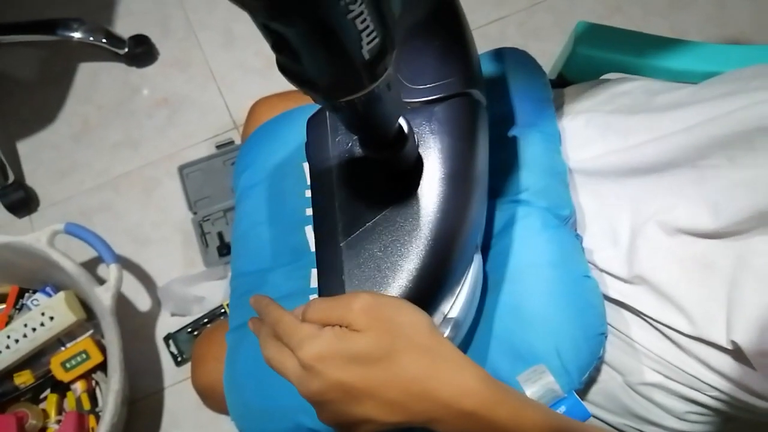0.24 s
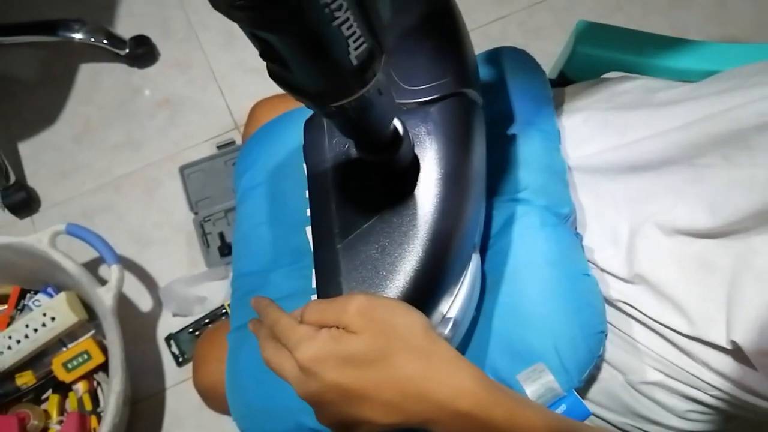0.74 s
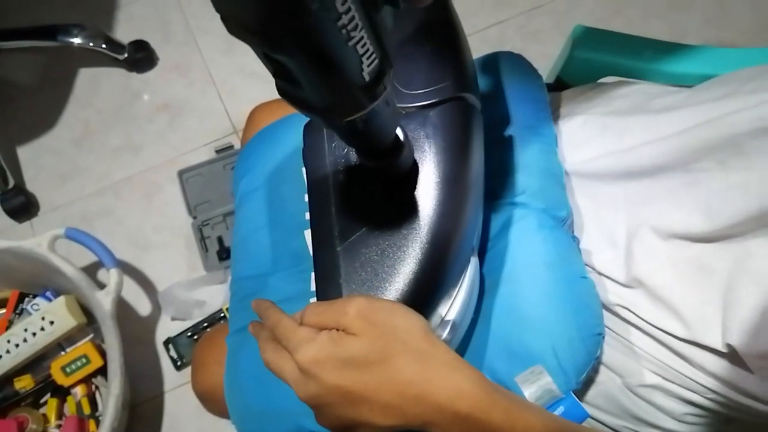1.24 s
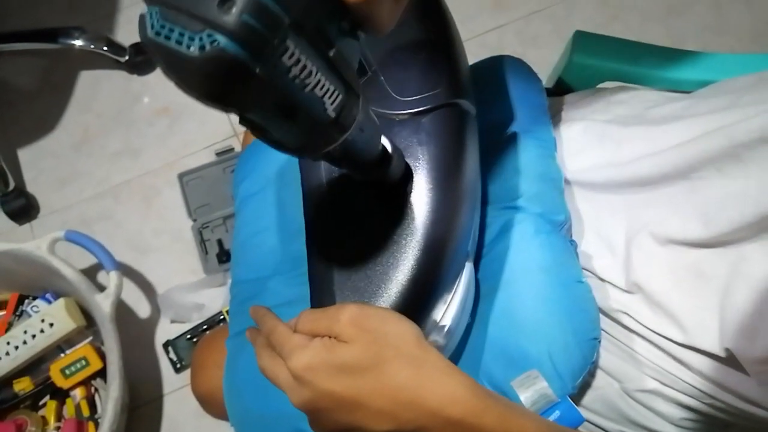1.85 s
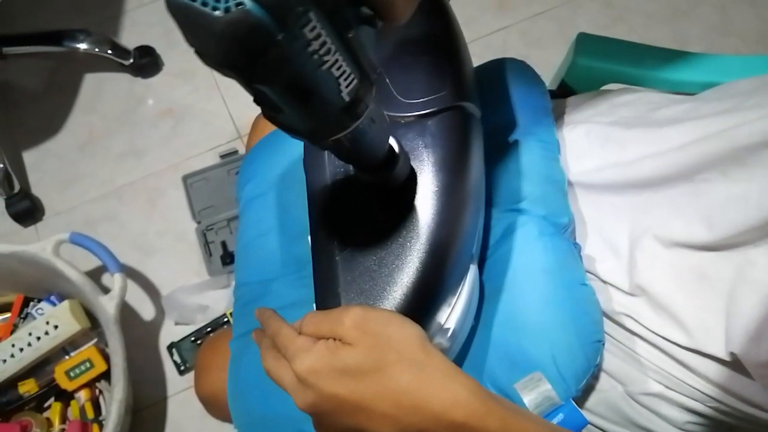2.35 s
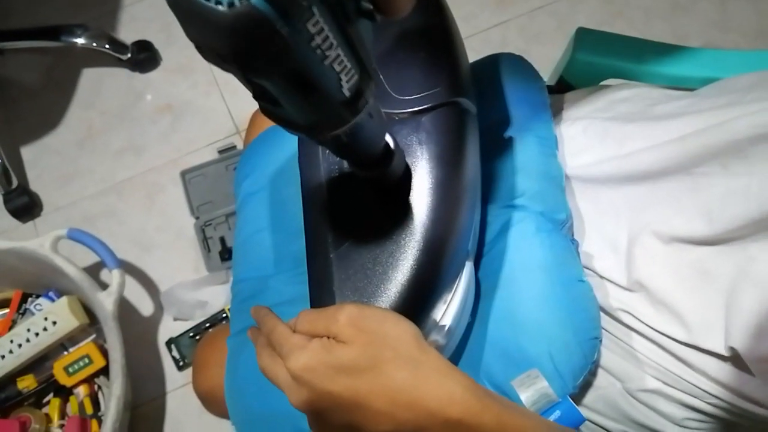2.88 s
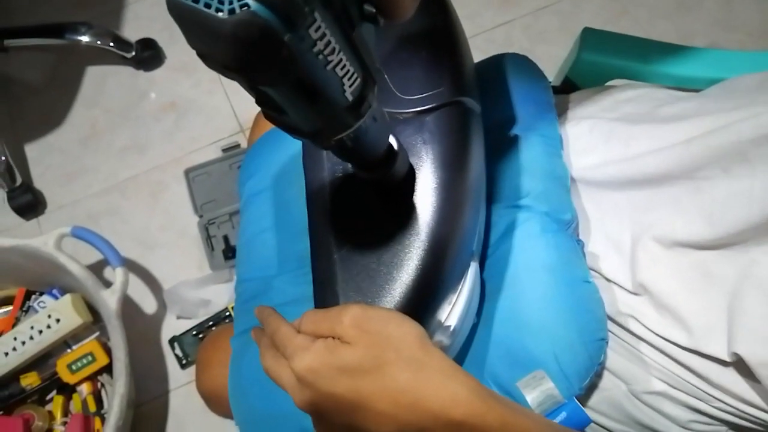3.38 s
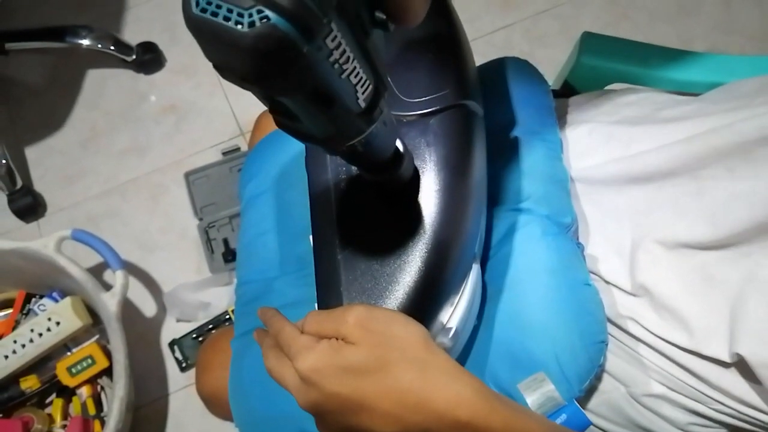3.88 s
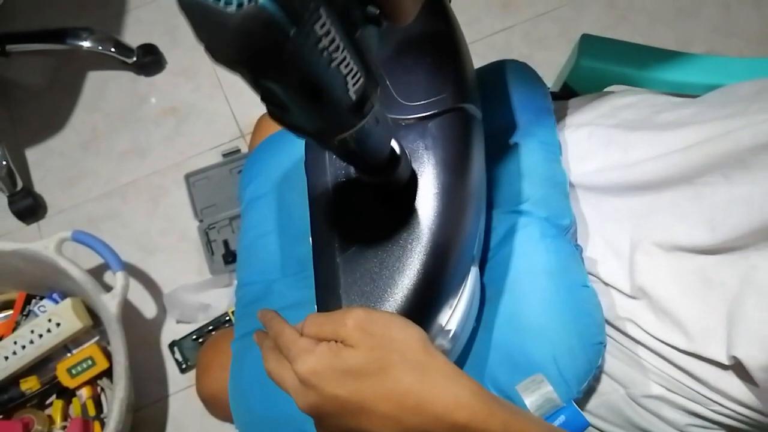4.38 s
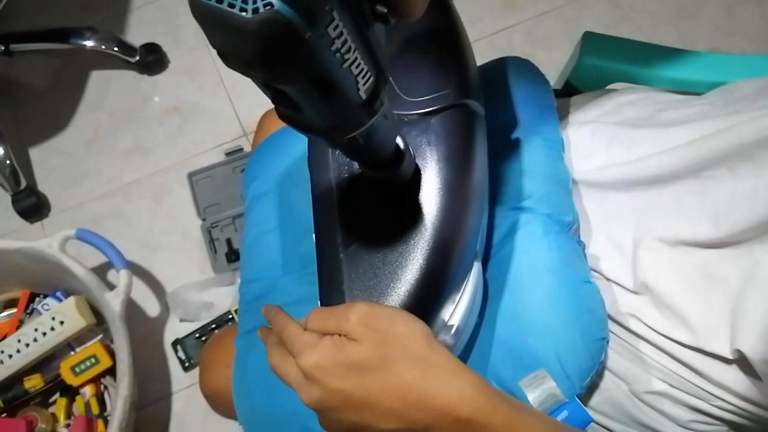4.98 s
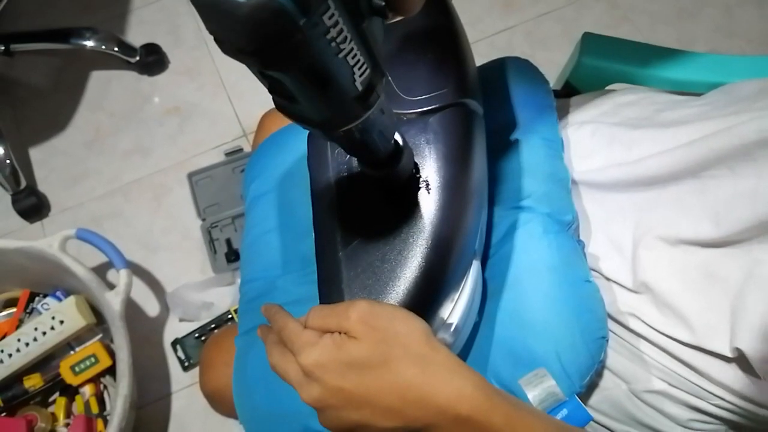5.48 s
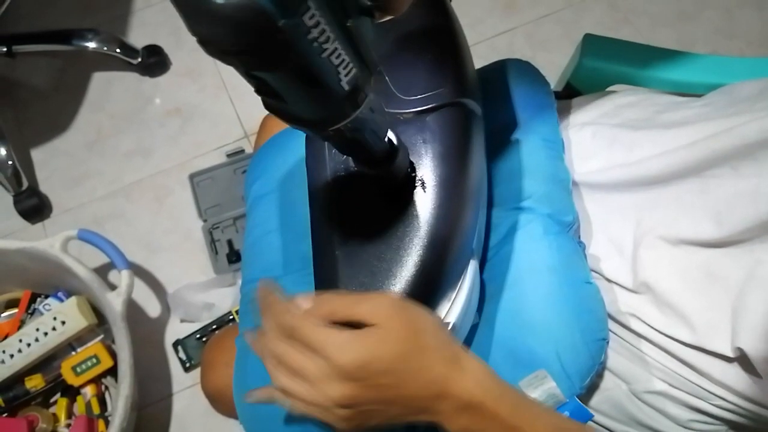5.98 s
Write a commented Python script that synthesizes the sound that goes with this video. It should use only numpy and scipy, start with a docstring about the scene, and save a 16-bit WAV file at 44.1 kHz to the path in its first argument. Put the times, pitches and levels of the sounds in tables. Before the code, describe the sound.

Close by in a small tiled room, a power drill with a hole saw grinds through a plastic shell for five seconds and stops abruptly.

```python
"""A cordless drill turns a hole saw against a hollow plastic panel, close by, in a small tiled room.
It creeps on a light trigger, steps up a little, spins up, sags as the saw bites, and brakes to a stop.
One shaft speed drives its motor and gear tones; filtered noise makes the rasp, rattle and panel drone.
The panel rings on briefly; then a hand slides off it with soft knocks and thin squeaks, over room tone."""
import sys
import numpy as np
from scipy import signal
from scipy.fft import rfft, irfft, next_fast_len
from scipy.io import wavfile
from scipy.ndimage import map_coordinates

SR = 44100
rng = np.random.default_rng(int(sys.argv[2]) if len(sys.argv) > 2 else 0)


def file_out(sig):
    """Save sig as 16-bit WAV at sys.argv[1]."""
    # one column per channel
    cols = np.atleast_2d(sig).T
    # limit, then scale
    lim = np.clip(cols, -1, 1)
    pcm = np.round(lim * 32767).astype(np.int16)
    wavfile.write(sys.argv[1], SR, pcm)


N = 274886  # length in samples


def amp(db):
    """Turn decibels into a gain."""
    return 10 ** (np.asarray(db) / 20)


def unit(x):
    """Scale to an average (rms) strength of 1."""
    return x / np.sqrt(np.mean(x ** 2) + 1e-20)


def along(points, hz):
    """Read a value between (Hz, value) points, with frequency on a log axis."""
    f, v = np.transpose(points)
    return np.interp(np.log(hz + 1), np.log(f + 1), v)


def clock():
    """Time of each sample in seconds."""
    return np.arange(N) / SR


def ramp(start, rise):
    """Go from 0 to 1 in rise seconds."""
    return np.clip((clock() - start) / rise, 0, 1)


def swell(start, length, db):
    """A rounded rise and fall that peaks at db."""
    return amp(db) * np.sin(np.pi * ramp(start, length)) ** 2


def wobble(rate):
    """A random curve through rate knots a second, drawn with 8192 straight-joined points."""
    knots = rng.standard_normal(int(N * rate / SR) + 4)
    coarse = np.linspace(0, N, 8192)
    values = map_coordinates(knots, [coarse * rate / SR])
    return np.interp(np.arange(N), coarse, values)


def filtered(x, response):
    """Shape the spectrum of x with a gain that depends on frequency."""
    m = next_fast_len(N + SR // 4)
    gain = response(np.fft.rfftfreq(m, 1 / SR))
    return irfft(rfft(x, m) * gain, m)[..., :N]


def pan(lean_db):
    """Left and right gains of unit mean power; positive leans left."""
    gains = amp(np.array([lean_db, -lean_db]) / 2).reshape(2, -1)
    return gains / np.sqrt(np.mean(gains ** 2, axis=0))


# How alike noise is on the left and right.
# Each row: frequency in Hz, likeness (1 is the same, 0 unrelated; larger values are clipped to 1).
ALIKENESS = [(60, 1.7), (120, 0), (240, 4.5), (480, 0.46), (950, 0.57), (1890, 0.53), (3770, 0.25),
             (7520, 0.09), (15000, -0.03)]
# How noise leans to one side. Each row: frequency in Hz, left over right in dB.
SIDE_LEAN = [(300, 1), (900, -3.5), (1350, 3.5), (1800, 2), (2300, -1.5), (2900, -5), (3500, -2),
             (4100, -3.5), (4900, 6.5), (6200, 1), (7200, -4.5), (8500, -0.5), (11000, 1), (15000, 2.5)]


def rush(spectrum, force=1):
    """Random contacts of a given force heard through a body: shaped stereo noise of rms 1."""
    def mid_and_side(hz):
        turn = np.arccos(np.clip(along(ALIKENESS, hz), -1, 1)) / 2
        gain = amp(along(spectrum, hz)) * (hz < spectrum[-1][0])
        return gain * [np.cos(turn), np.sin(turn)]

    mid, side = filtered(force * rng.standard_normal((2, N)), mid_and_side)
    stereo = np.array([mid + side, mid - side])
    return unit(filtered(stereo, lambda hz: pan(along(SIDE_LEAN, hz))))


def tone(angle, flutter, rate):
    """A partial of about rms 1 whose strength and phase flutter."""
    steady_part = (1 + flutter * wobble(rate)) * np.sin(angle)
    loose_part = flutter * wobble(rate) * np.cos(angle)
    return np.sqrt(2 / (1 + 2 * flutter ** 2)) * (steady_part + loose_part)


def ports(angle, multiple, lean_db, lead, flutter, rate):
    """A shaft tone at both microphone ports, its phase lead radians ahead on the left."""
    strength_flutter, phase_flutter = wobble(rate), wobble(rate)
    phase = multiple * angle + rng.uniform(0, 2 * np.pi) + np.array([[lead], [-lead]]) / 2
    line = (1 + flutter * strength_flutter) * np.sin(phase + flutter * phase_flutter)
    return pan(lean_db) * np.sqrt(2 / (1 + flutter ** 2)) * line


# Colour of the room tone. Each row: frequency in Hz, relative level in dB.
ROOM_COLOUR = [(15, -37), (25, -14), (98, -18.5), (150, -7.5), (167, -14.5), (543, -16), (588, -10.5),
               (691, -19), (952, -13), (1030, -12.5), (1420, -22.5), (2300, -17), (4040, -31), (6200, -33),
               (7090, -28.5), (8000, -37.5), (15000, -57)]
# Faint steady tones in the room. Each row: frequency in Hz, level in dB.
ROOM_TONES = [(586.8, -74.5), (748.3, -78), (1039, -77.5), (1157, -79.5)]
# Bumps on the hand-held microphone. Each row: start in seconds, length in seconds, peak level in dB.
MIC_BUMPS = [(5.4, 0.34, -61), (5.77, 0.17, -53), (5.85, 0.47, -60.5)]
# Swells of a faint low hum. Each row: start in seconds, length in seconds, peak level in dB.
HUM_SWELLS = [(5.65, .75, -66.5), (5.94, 0.15, -60)]


def background():
    """Room tone with faint steady tones, a low hum and the rumble of a hand-held microphone."""
    rumble_colour = [(20, 4), (55, -9), (110, -4), (220, -25)]  # Hz, relative dB
    rumble = sum(swell(*bump) for bump in MIC_BUMPS) * rush(rumble_colour)
    hum_tone = tone(2 * np.pi * 153 * clock(), flutter=.5, rate=20)
    hum = sum(swell(*row) for row in HUM_SWELLS) * hum_tone
    steady = 0
    for hz, db in ROOM_TONES:
        steady = steady + amp(db) * tone(2 * np.pi * hz * clock(), flutter=.4, rate=11)
    return amp(-59.5) * rush(ROOM_COLOUR) + steady + rumble + hum


# How long the echo lasts. Each row: frequency in Hz, time in seconds to fall by 60 dB.
ECHO_TIMES = [(200, 0.39), (2000, 0.43), (5000, 0.31), (14000, 0.3)]


def room(x):
    """The walls answer with a noisy tail, in which each frequency dies at its own speed."""
    hz, t, z = signal.stft(rng.standard_normal((2, SR // 2)), SR, nperseg=256)
    decay = amp(-60 * t / along(ECHO_TIMES, hz)[:, None])
    tail = signal.istft(z * decay, SR, nperseg=256)[1]
    tail *= np.arange(tail.shape[1]) > .006 * SR  # silent for the first 6 ms
    return signal.fftconvolve(x, tail / np.linalg.norm(tail[0]), axes=1)[:, :N]


# Thin squeaks on the plastic.
# Each row: start in seconds, length in seconds, start in Hz, end in Hz, level in dB before a 4.5 dB lift.
PLASTIC_SQUEAKS = [(6.114, 0.073, 6550, 5798, -66), (6.185, .06, 4380, 4700, -56)]


def squeaks():
    """Sticking and slipping on smooth plastic gives short, rough glides."""
    out = np.zeros(N)
    for start, length, start_hz, end_hz, db in PLASTIC_SQUEAKS:
        progress = ramp(start, length)
        glide = start_hz + (end_hz - start_hz) * np.sqrt(progress)
        rough_hz = glide * (1 + 0.065 * wobble(1400))
        out += amp(db + 4.5) * np.sin(np.pi * progress) * np.sin(2 * np.pi * np.cumsum(rough_hz) / SR)
    return out


# Colour of skin sliding on the panel. Each row: frequency in Hz, relative level in dB.
SKIN_COLOUR = [(530, -30), (900, -15), (1440, -14), (2360, -2), (2530, -21), (2620, -5), (5100, -17),
               (6120, -21), (14000, -35)]
# Colour of the panel's shell. Each row: frequency in Hz, relative level in dB.
SHELL_COLOUR = [(120, -20), (250, -5), (350, 5), (550, -7), (800, -18), (1150, -6), (1500, -20),
                (2200, -14), (4000, -26), (12000, -42)]
# The panel ringing on as the drill stops, then soft knocks.
# Each row: start in seconds, level in dB before the onset is softened.
SHELL_BURSTS = [(5.295, -35), (5.37, -47), (6.134, -49), (6.15, -46)]
SLIDE_S, SLIDE_RISE_S, SLIDE_DB = 5.96, 0.1, -58.5  # start and rise in seconds, level in dB


def handling():
    """Rough, quickly fluttering skin noise for the sliding hand; short shell bursts ring and knock."""
    skin = rush(SKIN_COLOUR, amp(2.0 * wobble(120)))
    slide = amp(SLIDE_DB) * ramp(SLIDE_S, SLIDE_RISE_S) * skin
    bursts = 0
    for start, db in SHELL_BURSTS:
        age = np.maximum(clock() - start, 0)
        # each burst falls 60 dB in 85 ms
        bursts = bursts + amp(db - 60 * age / 0.085) * (1 - np.exp(-age / 0.0024))
    return slide + bursts * rush(SHELL_COLOUR)


# light trigger: shaft speed at the start and after a nudge of the finger (turns per second)
CREEP_SPEED, NUDGE_SPEED = 115.6, 129.1
CREEP_GAIN = 26  # turns per second gained each second until the nudge
NUDGE_S, NUDGE_RISE_S = .103, .046  # time of the nudge, and how long the shaft takes to follow
PULL_S, SPIN_UP_S, SPIN_UP_SHAPE = .393, .114, 1.95  # trigger pulled home: time, spin-up time, steepness
EASE_S, SLOWING = 5.147, 485  # trigger eased: time, turns per second lost each second
RELEASE_S, BRAKE_S = 5.281, .033  # trigger let go: time, time constant of the braked shaft (s)


def nudged():
    """Share of the way from the first creeping speed to the second."""
    return 1 - np.exp(-(np.maximum(clock() - NUDGE_S, 0) / NUDGE_RISE_S) ** 2)


def pulled():
    """Share of the way from creeping to full speed."""
    return 1 - np.exp(-(np.maximum(clock() - PULL_S, 0) / SPIN_UP_S) ** SPIN_UP_SHAPE)


# The motor shaft at full trigger, sagging as the saw bites.
# Each row: time in seconds, speed in turns per second.
FULL_TRIGGER_SPEED = [(0.7, 353.7), (0.9, 352.3), (1.15, 354.4), (1.37, 352.5), (1.62, 354.2), (1.81, 346),
                      (1.92, 338), (2.0, 324.5), (2.09, 314.5), (2.56, 318.5), (2.63, 323.3), (2.75, 326),
                      (2.89, 326.7), (3.14, 341.3), (3.23, 339.5), (3.34, 334), (3.62, 333.3), (3.72, 331),
                      (3.86, 333.8), (4.5, 336.6), (4.95, 331.7), (5.03, 324.5), (5.14, 319)]


def shaft_speed():
    """The motor creeps, spins up, follows the load, slows with the trigger and is braked."""
    first = CREEP_SPEED + CREEP_GAIN * np.minimum(clock(), NUDGE_S)
    creeping = first + (NUDGE_SPEED - first) * nudged()
    full = np.interp(clock(), *np.transpose(FULL_TRIGGER_SPEED))
    running = creeping + pulled() * (full - creeping)
    eased = np.maximum(running - SLOWING * np.maximum(clock() - EASE_S, 0), 0)
    return eased * np.exp(-np.maximum(clock() - RELEASE_S, 0) / BRAKE_S)


# Shaft speeds in turns per second when the motor is laden, cutting and running light, in that order.
LOADED_SPEEDS = [316, 335, 353]


def by_speed(speed, free_db, fall):
    """Gain of a layer that loses fall dB for each turn per second below running light."""
    return amp(free_db - fall * (LOADED_SPEEDS[-1] - speed))


# Motor and gear tones while creeping, before the overall singing level.
# Each row: multiple of the shaft rate, dB before the nudge, dB after it.
CREEP_TONES = [(2, -58, -55), (10, -54, -36), (11, -52, -49), (11.25, -46, -54), (12, -58, -54),
               (21, -60, -52), (22.5, -52, -56), (29, -56, -46), (30, -51, -39.5), (31, -52, -38),
               (33.75, -35.5, -48), (34.65, -54, -44), (40, -50, -42), (41, -54, -45), (45, -38, -53),
               (46, -58, -48), (50, -62, -50), (57, -62, -49), (60, -58, -47)]
# Steady buzz on a light trigger. Each row: harmonic number, level in dB.
BUZZ_HARMONICS = [(2, -58), (3, -47), (4, -56), (5, -49.5), (6, -55.5), (7, -55.5), (8, -58), (9, -60),
                  (10, -57), (11, -47.5)]
SING_DB, SING_FALL = 1, .12  # singing level in dB; its fall in dB for each turn per second gained


def creep(speed, angle):
    """On a light trigger the motor sings thinly over a fixed-pitch buzz; a nudge changes the mix of tones."""
    singing = 0
    for k, first, second in CREEP_TONES:
        level = amp(first + (second - first) * nudged())
        line = ports(angle, k, lean_db=3.0, lead=min(k / 30, 1.5), flutter=0.1, rate=29.8)
        singing = singing + level * line
    buzz_hz = 118.6
    buzz = 0
    for k, db in BUZZ_HARMONICS:
        buzz = buzz + amp(db) * tone(2 * np.pi * k * buzz_hz * clock(), flutter=0.4, rate=16.3)
    sing_db = SING_DB - SING_FALL * np.maximum(speed - NUDGE_SPEED, 0)
    return (1 - pulled()) * (amp(sing_db) * singing + buzz)


GEAR_RATIO = 24  # shaft turns per turn of the saw
THROB_DB = 0.3  # overall lift of the panel's beating note
# The panel's note and its close neighbours, before the overall lift.
# Each row: steps of the saw's rate from the shaft rate, dB laden, dB cutting, dB running light.
THROB_TONES = [(-1, -58, -46.5, -56), (0, -42, -60, -54), (1, -53, -46.5, -43.2), (2, -62, -54, -58)]


def throb(speed, angle):
    """Shaft unbalance shakes the panel; the saw's rocking splits that note into close tones, which beat."""
    out = 0
    for sideband, *levels in THROB_TONES:
        note = tone(angle * (1 + sideband / GEAR_RATIO), flutter=.27, rate=22)
        out = out + np.interp(speed, LOADED_SPEEDS, amp(levels)) * note
    fade_in = np.interp(speed, [190, 300], [0, 1])  # turns per second
    return amp(THROB_DB) * fade_in * out


# Resonances of the housing. Each row: multiple of the shaft rate, centre in Hz, width in Hz, level in dB,
# left over right in dB, left lead in radians.
HOUSING_RESONANCES = [(3, 780, 120, -41, -2, .2), (7, 1880, 120, -42, -2, .4),
                      (10, 2760, 260, -36, -2, 1.2), (20, 5900, 280, -36, 0, .4),
                      (20, 7050, 260, -30.5, -8, 2.5), (23, 6850, 330, -39.5, -4, 1.6),
                      (30, 8300, 700, -45, -4, -1.5)]


def glides(speed, angle):
    """As the speed changes, single tones flare where they meet resonances of the housing."""
    out = 0
    for k, hz, width, db, lean_db, lead in HOUSING_RESONANCES:
        closeness = np.exp(-((k * speed - hz) / width) ** 2)
        out = out + amp(db) * closeness * ports(angle, k, lean_db, lead, flutter=.12, rate=36)
    return out


# Colour of the rasping teeth. Each row: frequency in Hz, relative level in dB.
RASP_COLOUR = [(280, -51), (480, -20.5), (650, -14), (800, -12), (1000, -9), (1150, -5.5), (1300, -0.6),
               (1550, -2.5), (1900, 0.5), (2150, -3), (2400, -3), (2750, -6), (3100, -11.5), (4000, -30.5)]
# Colour of the gear rattle at full trigger. Each row: frequency in Hz, relative level in dB.
RATTLE_COLOUR = [(2300, -44), (3150, -17.5), (3450, -7), (3700, -5.5), (4050, -0.5), (4400, -6),
                 (5100, 1.5), (5700, -4.5), (6300, -11.5), (7600, -8.5), (8500, -11.5), (10500, -14.5),
                 (12500, -18.5), (15000, -23.5)]
# Colour of the gear rattle on a light trigger. Each row: frequency in Hz, relative level in dB.
CREEP_RATTLE_COLOUR = [(2300, -35.5), (3150, -25), (3450, -13), (3700, -8), (4050, -1.5), (4380, -12),
                       (4600, -4), (4850, -7.5), (5150, 0), (5600, -6.5), (6250, -14), (7500, -10.5),
                       (8200, -16), (9500, -14), (11000, -21), (15000, -27)]
# Colour of the panel's drone. Each row: frequency in Hz, relative level in dB.
PANEL_COLOUR = [(20, -42.5), (65, -44), (115, -21), (160, -27.5), (210, -13), (245, -8.5), (275, -5.5),
                (325, -3.5), (370, 3), (400, -11), (500, -14.5), (700, -42.5)]
# levels running light (dB), and their fall for each turn per second below that (dB)
RASP_DB, RASP_FALL = -25, 0.057
RATTLE_DB, RATTLE_FALL = -23.5, 0.013
NUDGE_RASP_DB = 1  # how much quieter the rasp is before the nudge
CREEP_RATTLE_DB = -28  # the gears tick over on a light trigger
# the torque of spinning up loads gears and teeth: length in seconds, lifts in dB
SURGE_S, SURGE_RATTLE_DB, SURGE_RASP_DB = 0.21, 2.5, 0.5
PANEL_DB, PANEL_CREEP_DB = -45.5, -52.5  # panel drone at full and at light trigger
JOLT_S, JOLT_DB = 0.14, -42  # the torque of the pull jolts the panel: length, peak level


def cutting(speed, angle):
    """Teeth rasp, gears rattle in step with the shaft, and the saw makes the panel drone."""
    surge = swell(PULL_S, SURGE_S, 0)

    # teeth: the bite varies as the saw turns and wanders in its groove
    spindle = angle / GEAR_RATIO + 0.59 * wobble(12)
    bite = amp(0.44 * np.sin(spindle) + 0.23 * wobble(22.06) + 0.7 * wobble(600))
    shaft_pulse = 1 + 0.15 * np.cos(2 * angle) + 0.2 * np.cos(4 * angle)
    rasp_db = RASP_DB - NUDGE_RASP_DB * (1 - nudged()) + SURGE_RASP_DB * surge
    rasp = by_speed(speed, rasp_db, RASP_FALL) * rush(RASP_COLOUR, bite * shaft_pulse)

    # gears: the rattle cross-fades as the trigger is pulled
    meshing = 1 + 0.091 * sum(np.cos(k * angle + rng.uniform(0, 2 * np.pi)) for k in range(1, 6))
    clatter = meshing * amp(0.45 * wobble(30) + 1.1 * wobble(900))
    slow = np.sqrt(1 - pulled()) * amp(CREEP_RATTLE_DB) * rush(CREEP_RATTLE_COLOUR, clatter)
    fast_gain = by_speed(speed, RATTLE_DB, RATTLE_FALL)
    fast = np.sqrt(pulled()) * fast_gain * rush(RATTLE_COLOUR, clatter)
    rattle = amp(SURGE_RATTLE_DB * surge) * (slow + fast)

    # panel
    shaking = amp(PANEL_CREEP_DB + (PANEL_DB - PANEL_CREEP_DB) * pulled())
    jolt = swell(PULL_S - .02, JOLT_S, JOLT_DB)
    return rasp + rattle + (shaking + jolt) * rush(PANEL_COLOUR)


# Motor tones; the housing favours other ones at each speed. Each row: multiple of the shaft rate,
# dB laden, dB cutting, dB running light (all before a 0.5 dB trim and the growth with speed),
# left over right in dB, left lead in radians.
MOTOR_TONES = [(2, -42.5, -43.5, -48, 2, -.3), (3, -40, -41.5, -38, -3, .8), (4, -40, -36, -37, 3, -.3),
               (6, -42, -43, -43, 0, .4), (8, -56, -43.5, -46, -7, -.6), (10, -43, -42, -37, 3, 2.2),
               (11, -48, -42.5, -45, -1, .8), (12, -43, -43.5, -47, -1, .7), (14, -47, -47, -44, 8, 1.5),
               (15, -42, -41, -40, 9, .7), (17, -42, -46, -45, 6, -1), (19, -44, -56, -43, 1, 1.5),
               (20, -41.5, -38.5, -50, 2, 0), (22, -49, -47, -44, -3, -2.5), (23, -30, -34.5, -36, -5, 1.6),
               (24, -48, -50, -53, -1, 1.4), (29, -55, -49, -53, -5, 1.4), (30, -40.5, -46, -42, -2, -2.4),
               (40, -57, -57, -48, 6, -1.2)]
# How unsteady each motor tone is, at every load.
# Each row: multiple of the shaft rate, flutter from 0 to 1.
MOTOR_FLUTTER = [(2, .25), (4, .35), (20, .25)]
# The gear whistle, smothered while the motor is laden. Each row: speed in turns per second, level in dB.
WHISTLE_LEVELS = [(130, -70), (260, -45), (318.5, -41), (323, -33.8), (330, -32), (339, -32), (346, -30),
                  (353, -28.8)]


def whine(speed, angle):
    """Motor tones grow steeply up to laden speed; the first gear stage whistles between two of them."""
    tones = np.zeros((2, N))
    for multiple, *levels, lean_db, lead in MOTOR_TONES:
        flutter = np.interp(multiple, *np.transpose(MOTOR_FLUTTER))
        level = amp(np.interp(speed, LOADED_SPEEDS, levels))
        tones += level * ports(angle, multiple, lean_db, lead, flutter, rate=45)
    growth = np.minimum(speed / LOADED_SPEEDS[0], 1) ** 7
    motor = tones * amp(-0.5) * pulled() * growth

    mesh_order = 11.25  # whistle cycles per shaft turn
    whistle = ports(angle, mesh_order, lean_db=-4, lead=.3, flutter=0.05, rate=60)
    # the pinion runs slightly off centre, which adds a weak side tone
    sideband = amp(-25) * ports(angle, mesh_order + 1, lean_db=-5.5, lead=.7, flutter=0.29, rate=20)
    whistle_gain = amp(np.interp(speed, *np.transpose(WHISTLE_LEVELS)))
    return motor + whistle_gain * (whistle + sideband)


# Colour of the saw scraping as it comes to rest. Each row: frequency in Hz, relative level in dB.
SCRAPE_COLOUR = [(1400, -25), (2000, -1.5), (2900, 0.5), (3500, -12.5), (8000, -22.5)]
SCRAPE_S, SCRAPE_LENGTH_S, SCRAPE_DB = 5.3, 0.27, -57  # start, length, peak level
WHOOP_S, WHOOP_DB = 0.078, -43  # the motor whoops downward as it is braked: length, peak level


def drill():
    """One shaft drives the running layers and the brake cuts them off; a whoop and a scrape follow."""
    speed = shaft_speed() * (1 + .0009 * wobble(20) + .0007 * wobble(120))
    angle = 2 * np.pi * np.cumsum(speed) / SR
    running = sum(layer(speed, angle) for layer in (whine, glides, creep, throb, cutting))
    brake = amp(-380 * np.maximum(clock() - RELEASE_S, 0))  # falls 380 dB a second
    whoop_tone = ports(angle, 10, lean_db=-2, lead=.6, flutter=.5, rate=250)
    whoop = swell(RELEASE_S - .01, WHOOP_S, WHOOP_DB) * whoop_tone
    scrape_noise = rush(SCRAPE_COLOUR, amp(2.5 * wobble(150)))
    scrape = swell(SCRAPE_S, SCRAPE_LENGTH_S, SCRAPE_DB) * scrape_noise
    return brake * running + whoop + scrape


def scene():
    """Drill and hand close by, the room behind them."""
    near = drill() + handling() + squeaks()
    return near + amp(-10.5) * room(near) + background()


def record(dry):
    """Keep nothing at or above 15150 Hz."""
    return filtered(dry, lambda hz: hz < 15150)


dry = scene()
out = record(dry)
file_out(out)
```